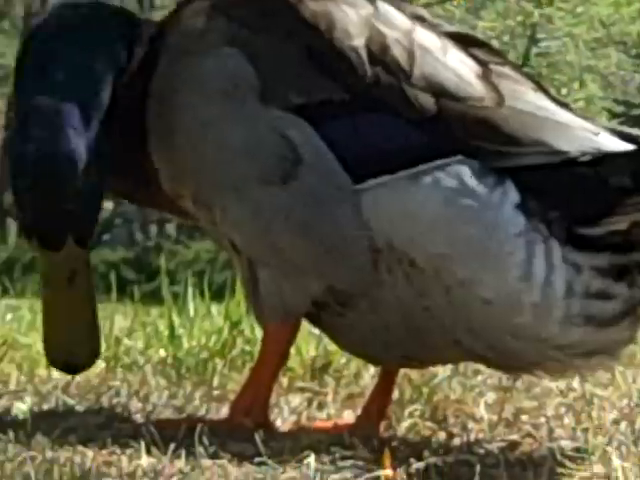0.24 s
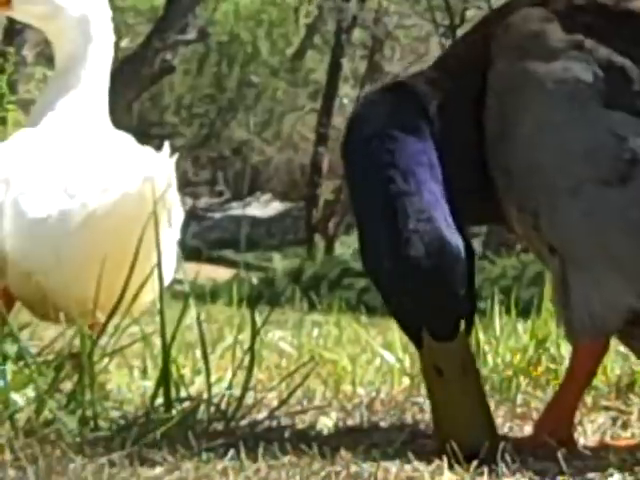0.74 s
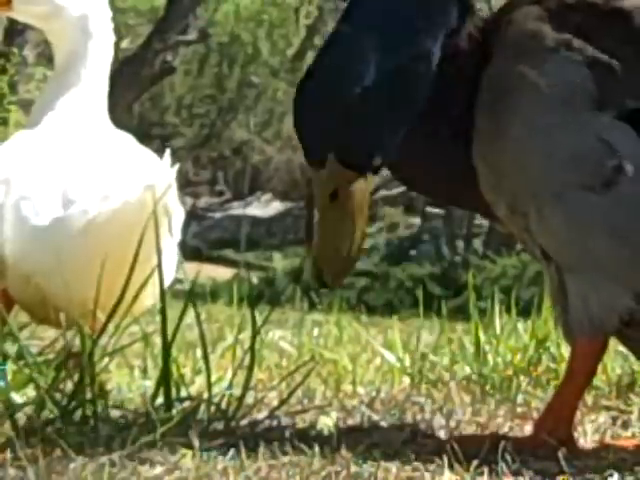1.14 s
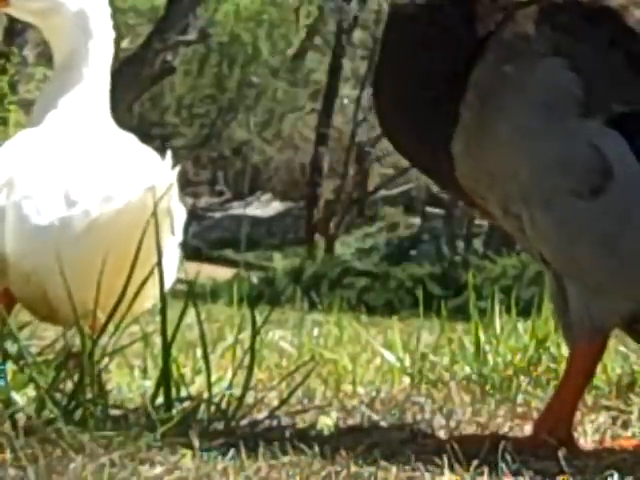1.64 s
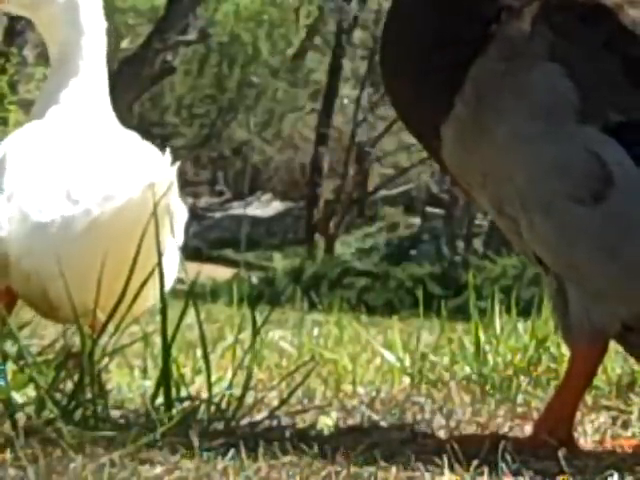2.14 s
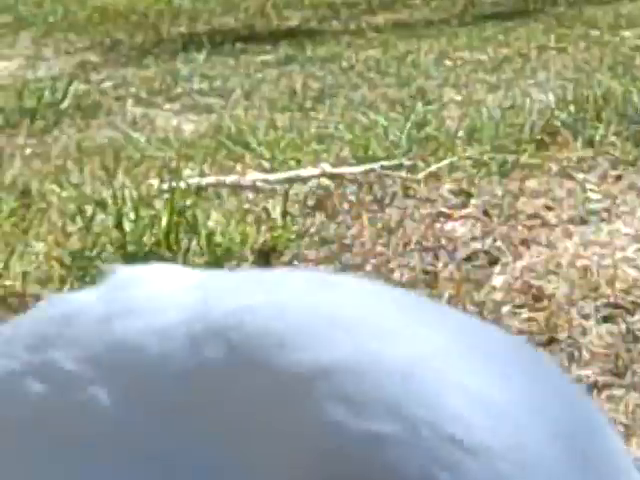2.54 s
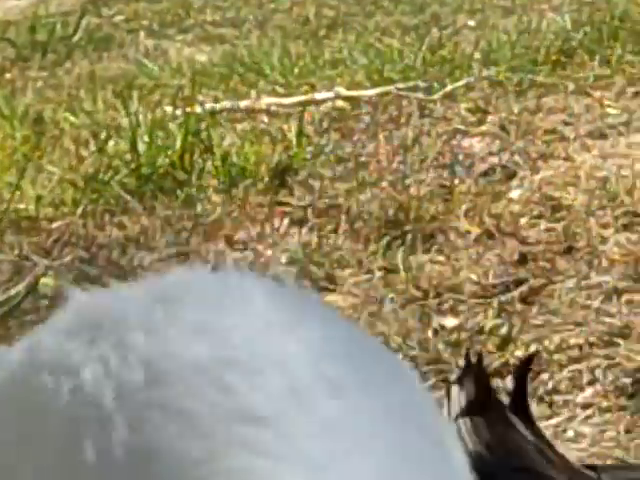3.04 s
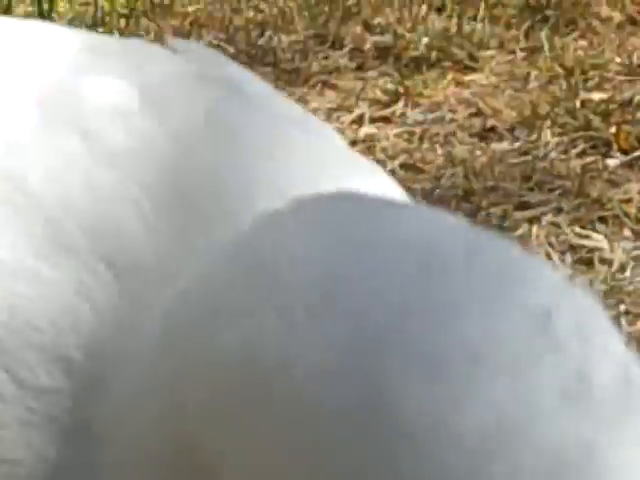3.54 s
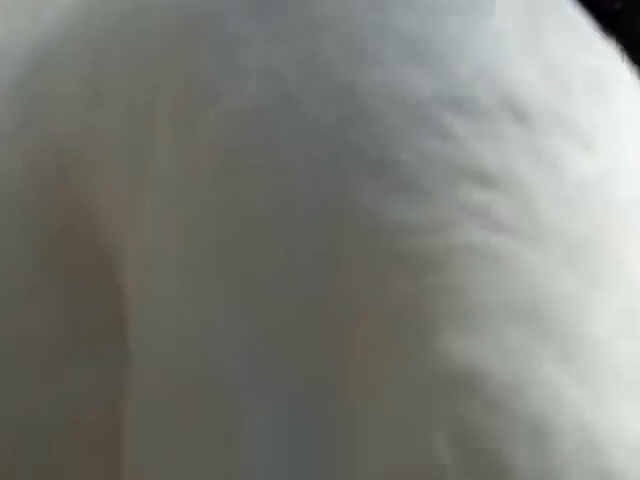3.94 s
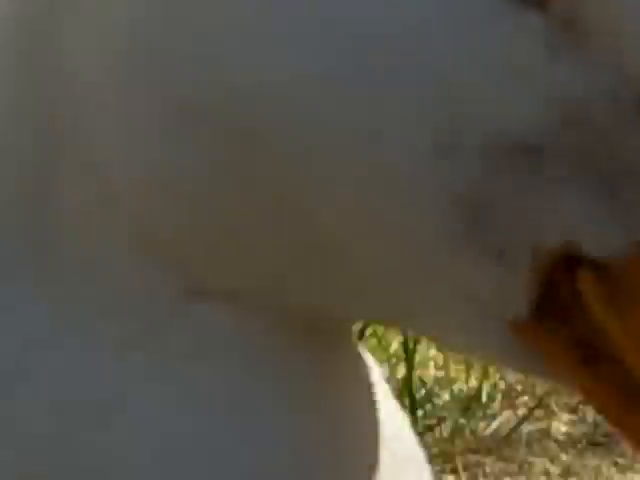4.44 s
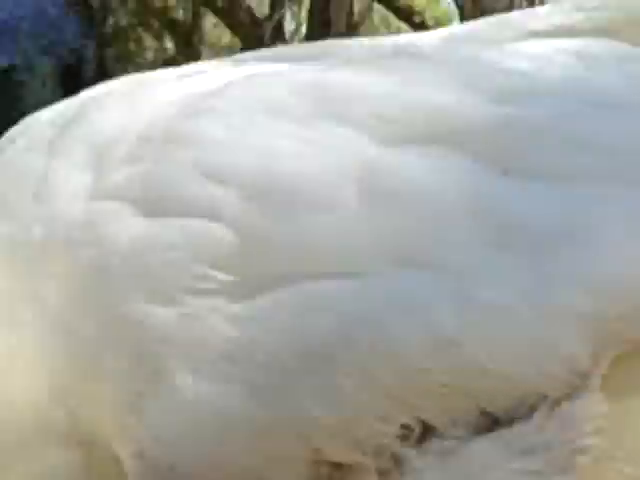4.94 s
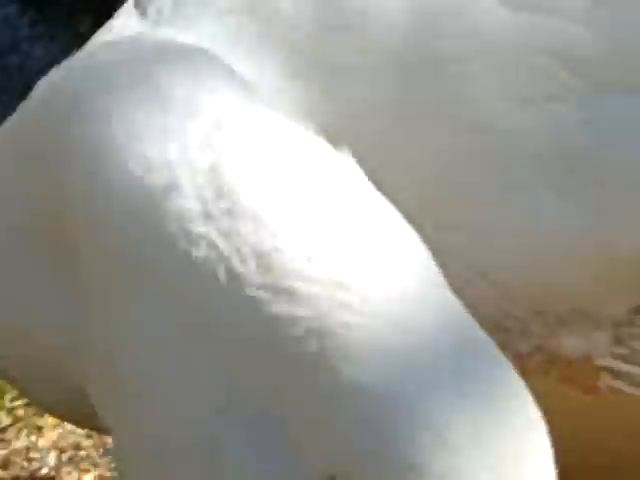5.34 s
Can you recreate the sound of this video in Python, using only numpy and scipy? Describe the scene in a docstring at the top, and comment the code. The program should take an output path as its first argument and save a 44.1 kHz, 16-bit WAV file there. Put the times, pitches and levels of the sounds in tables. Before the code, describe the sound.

Outdoors in quiet air, nearby ducks mutter softly and peck at the ground. They break into about a dozen short, raspy quacks, uneven in loudness, with a few clicks of their bills and thin, faint birdsong behind. Near the end the calls give way to a sharp tap on the microphone, brushing feathers, snapping dry blades and gentle handling bumps. Everything is close, with barely any echo.

```python
"""Ducks chat in short, raspy quacks and breathy mutters, foraging on a lawn beside a hand-held camera.
Each call is a handful of slow syrinx beats that ring the throat. Feathers and grass rustle, dry blades
snap, bills peck, push at the ground and clap, and the camera is bumped and rumbles in the hand.
A songbird twitters in the trees, which return a faint echo over quiet open air."""
import sys
import numpy as np
from scipy import signal
from scipy.fft import rfft, irfft
from scipy.io import wavfile
from scipy.ndimage import uniform_filter1d

SR = 44100
rng = np.random.default_rng(int(sys.argv[2]) if len(sys.argv) > 2 else 0)


def int16_out(signal):
    """Quantize to a 16-bit WAV file."""
    q = np.round(np.clip(np.atleast_2d(signal).T, -1, 1) * 32767)
    wavfile.write(sys.argv[1], SR, q.astype(np.int16))


N = 246519
T = np.arange(N) / SR
FFT_SIZE = 4096
FREQ_HZ = np.maximum(np.fft.rfftfreq(FFT_SIZE, 1 / SR), 1)


def undb(db):
    """Decibels to gain."""
    return 10 ** (np.asarray(db) / 20)


def unit(x):
    """Scale to rms 1."""
    return x / np.sqrt(np.mean(x ** 2))


def decay(t, t60_s):
    """Exponential fall, 60 dB in t60_s."""
    return np.exp(-np.log(1000) * t / t60_s)


def colour(points):
    """Gain over frequency from (freq_hz, gain_db) points."""
    hz, db = np.transpose(points)
    return undb(np.interp(np.log(FREQ_HZ), np.log(hz), db))


def peak(hz, width_hz):
    """Gain of a resonance."""
    return 1 / (1 + ((FREQ_HZ - hz) / (width_hz / 2)) ** 2)


def shelf(hz):
    """Rises from 0 to 1 around hz."""
    return 1 / (1 + (hz / FREQ_HZ) ** 10)


def ring(x, gain):
    """Minimum-phase filter with this gain over frequency."""
    cepstrum = irfft(np.log(gain + 1e-6))
    cepstrum[1:FFT_SIZE // 2] *= 2
    cepstrum[FFT_SIZE // 2 + 1:] = 0
    impulse = irfft(np.exp(rfft(cepstrum)))
    return signal.fftconvolve(x, impulse)[:len(x)]


def walk(rate_hz):
    """Random drift, spread near 1."""
    knots = rng.standard_normal(N // 100)
    return np.interp(T * rate_hz, np.arange(len(knots)), knots)


def add(out, start_s, x):
    """Mix x into out."""
    i = int(start_s * SR)
    skip = max(-i, 0)
    x = x[skip:N - i]
    out[i + skip:i + skip + len(x)] += x


# Background spectrum: freq_hz, gain_db
AIR_SPECTRUM = [(18, -29.5), (30, -9.5), (79, -5), (300, -9.5), (2000, -10.5), (8300, -19.5),
                (16000, -25.5)]

def open_air(level_db=-60):
    """Quiet, slightly wavering background noise."""
    noise = unit(ring(rng.standard_normal(N), colour(AIR_SPECTRUM)))
    return noise * undb(level_db + walk(rate_hz=18))


# Windpipe and throat resonances: freq_hz, width_hz, gain_db
THROAT_MODES = [(985, 200, -12.5), (1316.6, 150, -3), (1649, 160, -3.5), (2035, 87, -0.5),
                (2461, 150, -6.5), (2823, 240, -6), (3356, 260, -7), (4046, 281, -15.5), (4535, 300, -17.5),
                (5086, 240, -25.5), (5650, 450, -31)]

def quack(rate_hz, swell_s, fade_s, bill_hz, pitch_ratio, bright_db, wheeze_db, wheeze_hz, breath):
    """One call, loudest at 0.1 s: each syrinx beat rings the throat and puffs turbulent air."""
    open_s, ring_s, lag_s = 0.0015, 0.0024, 0.0003
    shut_hz, shut_db, bill_db = 1320, -7, 6
    rasp, bend, lift = 0.24, 0.12, 0.041
    scatter, slip_rad, uneven_db = 0.012, 0.5, 2
    t = np.arange(-SR // 10, SR // 10) / SR
    mode_hz, _, mode_db = np.transpose(THROAT_MODES)
    modes = len(mode_hz)
    power = sum((undb(db) * peak(hz * pitch_ratio, width)) ** 2 for hz, width, db in THROAT_MODES)
    throat = np.sqrt(power * shelf(850))
    hiss = undb(-33) / np.hypot(1, FREQ_HZ / 7000)
    tone_db = bright_db * (shelf(2300) - shelf(4900)) + wheeze_db * peak(wheeze_hz, 1700) ** 2
    phase = rng.uniform(0, 2 * np.pi, modes)
    call, beats = np.zeros(len(t)), np.arange(-4, 5)
    for beat_s in beats / rate_hz + lag_s * beats ** 2:  # beats spread as the call runs down
        near = np.abs(t - beat_s) < 1 / rate_hz
        since_s = t[near] - beat_s
        effort = 1 / (1 + abs(beat_s / (swell_s if beat_s < 0 else fade_s)) ** 3.98)
        # Effort opens the bill: resonances climb, upper bands come out.
        opening = np.sqrt(effort)
        shape_db = tone_db + bill_db * peak(shut_hz + (bill_hz - shut_hz) * opening, 280)
        shape_db += shut_db * (1 - opening) * (shelf(1400) - shelf(4400) / 2)
        detune = 1 - lift * (1 - opening) + scatter * rng.standard_normal(modes)
        pitch_hz = mode_hz * pitch_ratio * detune
        cycles = np.outer(since_s + bend * rate_hz * since_s ** 2, pitch_hz)
        angle = 2 * np.pi * cycles + phase + slip_rad * rng.standard_normal(modes)
        level_db = mode_db + np.interp(pitch_hz, FREQ_HZ, shape_db)
        level_db += uneven_db * rng.standard_normal(modes)
        flow = 2 / (np.exp(-since_s / open_s) + np.exp(since_s / ring_s))
        voice = flow * (np.sin(angle) @ undb(level_db))
        air = unit(ring(rng.standard_normal(len(since_s)), throat * undb(shape_db) + hiss))
        leak = 2 * breath * np.cos(np.pi / 2 * rate_hz * since_s)
        puff = unit((flow + leak) * air)
        call[near] += effort * unit(unit(voice) + (rasp + 2 * breath) * puff)
    return call / np.sqrt(2)


def breathiness(level_db, midpoint_db=-36):
    """The softer a call, the more of it is air."""
    return 0.08 + 0.4 / (1 + undb(level_db - midpoint_db) ** 2)


# Soft calls: centre_s, relative_db, swell_s, open_bill_hz, wheeze_db, wheeze_hz
MUTTERS = [(.071, -20.5, 0.024, 1860, 5.5, 4360), (0.141, -27, 0.023, 1600, -9, 4430),
           (0.411, -35, 0.024, 1220, -13, 4500), (.995, -37, 0.026, 1115, 0, 4500),
           (1.531, -40.5, 0.036, 1080, 15, 4740), (1.675, -32.5, 0.029, 1200, 7, 4500),
           (1.755, -29.5, 0.017, 2190, 32, 5540), (2.078, -38, 0.034, 1340, 6, 4770),
           (2.272, -33, 0.028, 1640, 6, 4530), (2.599, -23.5, 0.02, 1180, 23.5, 5240)]
# Full calls: centre_s, relative_db, swell_s, open_bill_hz, pitch_ratio, wheeze_db, wheeze_hz
QUACKS = [(2.343, -12, 0.025, 1970, 1.003, 11.5, 4950), (2.540, -7.5, 0.019, 2070, 1.016, 6, 5130),
          (2.934, -10.5, .018, 1458, 0.984, 3, 4900), (3.136, -4.5, 0.018, 1650, 1, -0.5, 5300),
          (3.387, -22, .019, 1780, 1.01, 8, 5330), (3.594, -14.5, 0.022, 1445, 1.014, 11.5, 5280),
          (3.788, -13, .021, 1630, 1.01, 16.5, 5050), (4.244, -27, .013, 1280, 1.06, 18, 4800),
          (4.296, -10.5, 0.018, 1770, 0.997, 5, 5400), (4.460, -23, 0.015, 1560, 0.96, 3, 5000),
          (4.497, -5.5, 0.019, 2070, 1.015, 5, 4900), (4.721, -13.5, 0.021, 2280, 1.025, 5, 4340)]

def ducks(gain_db=-7.5, full_effort_db=-6):
    """Quacks and breathy mutters; a weaker quack beats slower and sounds duller."""
    out = np.zeros(N)
    for centre_s, db, swell_s, bill_hz, pitch_ratio, wheeze_db, wheeze_hz in QUACKS:
        rate_hz = 75.5 + 0.68 * (db - full_effort_db)
        bright_db = -2 + 1.11 * (db - full_effort_db)
        call = quack(rate_hz, swell_s, 1.2 * swell_s, bill_hz, pitch_ratio, bright_db,
                     wheeze_db, wheeze_hz, breathiness(db))
        add(out, centre_s - 0.1, undb(db) * call)
    rate_hz, pitch_ratio, bright_db = 72, 0.92, -2.5
    for centre_s, db, swell_s, bill_hz, wheeze_db, wheeze_hz in MUTTERS:
        call = quack(rate_hz, swell_s, swell_s, bill_hz, pitch_ratio, bright_db,
                     wheeze_db, wheeze_hz, breathiness(db))
        add(out, centre_s - 0.1, undb(db) * call)
    return undb(gain_db) * out


def echo(x, t60_s, onset_s):
    """Diffuse returns from ground, bodies and trees."""
    t = np.arange(SR) / SR
    tail = rng.standard_normal(SR) * decay(t, t60_s) * (1 - np.exp(-t / onset_s))
    return signal.fftconvolve(x, tail / np.linalg.norm(tail))[:N]


def crackle(spectrum, band_rate_hz, spread_db, hiss):
    """Tiny uneven slips over hiss; blades of each size tick in their own band."""
    out, count = hiss * rng.standard_normal(N), int(band_rate_hz * N / SR)
    for hz in np.geomspace(400, 14000, 9):
        signs = rng.choice([-1, 1], count)
        size_db = spread_db * np.minimum(rng.exponential(size=count), 3)
        slips = np.zeros(N)
        slips[rng.integers(0, N, count)] = signs * undb(size_db)
        out += ring(unit(slips), peak(hz, hz / 2))
    return unit(ring(out, colour(spectrum)))


# Feathers and dry blades brushing by: centre_s, relative_db, half_width_s
STROKES = [(.071, -42.5, 0.021), (0.165, -45, 0.022), (.42, -55, 0.027), (0.61, -43, 0.038),
           (2.415, -39, 0.012), (2.435, -54, 0.15), (2.491, -47, .01), (4.537, -44.5, 0.072),
           (4.847, -46, 0.031), (5.06, -44.5, 0.049), (5.183, -50, 0.036), (5.288, -39.5, .012),
           (5.43, -52.5, 0.13)]
# Their spectrum: freq_hz, gain_db
BRUSH_SPECTRUM = [(500, -10), (2000, -3), (9000, -3), (16000, -7.5)]
# Envelope of a rooting bill: time_s, level_db
ROOTING = [(.31, -67), (.35, -47), (.45, -47), (.5, -65.5), (.55, -47), (.61, -37.5), (.665, -58),
           (.8, -48), (.92, -64)]
# Torn turf spectrum: freq_hz, gain_db
TURF_SPECTRUM = [(70, -22), (210, 2), (450, -10.5), (1170, 1.5), (2400, -13.5), (10000, -22.5),
                 (15000, -39)]

def rustle(stroke_gain_db=-1, flutter_db=2):
    """Feathers brush past in short strokes; a bill tears at dry turf."""
    feathers = crackle(BRUSH_SPECTRUM, band_rate_hz=70, spread_db=5.5, hiss=0.45)
    turf = crackle(TURF_SPECTRUM, band_rate_hz=220, spread_db=3.5, hiss=0.4)
    strokes = sum(undb(db + stroke_gain_db) / (1 + ((T - centre_s) / half_width_s) ** 2 / 2) ** 2
                  for centre_s, db, half_width_s in STROKES)
    time_s, level_db = np.transpose(ROOTING)
    rooting = undb(np.interp(T, time_s, level_db)) * (T < time_s[-1])
    return (feathers * strokes + turf * rooting) * undb(flutter_db * walk(rate_hz=68))


# Breaking blades: start_s, relative_db
SNAPS = [(.337, -38), (0.475, -31), (2.477, -29), (4.61, -26.5), (5.058, -30), (5.179, -29), (5.378, -27),
         (5.43, -25), (5.548, -24.5)]

def snaps(gain_db=-3, ring_db=4.5):
    """Dry blades break with a crisp tick, each at its own pitch."""
    out, t = np.zeros(N), np.arange(SR // 20) / SR
    for start_s, db in SNAPS:
        hz = rng.uniform(3000, 11000)
        blade = colour(BRUSH_SPECTRUM) * undb(ring_db * peak(hz, hz / 2))
        tick = ring(rng.standard_normal(len(t)) * decay(t, t60_s=0.011), blade)
        add(out, start_s, undb(db + gain_db) * tick / np.abs(tick).max())
    return out


# Pecks at the ground, knocks on the camera: start_s, peak_db, treble_db
PECKS = [(.397, -31, -22), (.539, -33.5, -15), (0.564, -29, -8), (.604, -22.5, -12), (.643, -21.5, -11),
         (.828, -30, -1), (0.881, -27.5, -8), (5.0193, -6.5, 6.5), (5.083, -29.5, -11), (5.283, -26, -30),
         (5.348, -22, 12.5)]
# Bills clapping shut: start_s, peak_db
CLAPS = [(1.422, -34.5), (1.483, -29), (2.038, -33), (2.3047, -14.5), (2.8946, -13.5), (4.253, -21.5)]
# Contact spectrum: freq_hz, gain_db
KNOCK_SPECTRUM = [(60, -42), (250, -14), (520, -6), (1050, 6.5), (2000, -5.5), (3500, -13.5), (7000, -19.5),
                  (15000, -26)]

def pecks_and_claps(crunch=0.23, treble_hz=2500, clap_treble_db=-3):
    """Sharp contact, then crunch; harder is brighter and shorter. A clap rings the hollow bill."""
    out, t = np.zeros(N), np.arange(SR // 10) / SR
    bill_ring_db = 16.5 * peak(3550, width_hz=1100)
    blows = [(*peck, 0) for peck in PECKS] + [(*clap, clap_treble_db, bill_ring_db) for clap in CLAPS]
    for start_s, peak_db, treble_db, ring_db in blows:
        t60_s = 0.024 / 2 ** (treble_db / 24)
        blow = crunch * rng.standard_normal(len(t)) * decay(t, t60_s)
        blow[0] += 1
        tilt_db = treble_db * FREQ_HZ / (FREQ_HZ + treble_hz)
        hit = ring(blow, colour(KNOCK_SPECTRUM) * undb(ring_db + tilt_db))
        add(out, start_s, undb(peak_db) * hit / np.abs(hit).max())
    return out


# Soft, low thumps: centre_s, level_db
THUMPS = [(.608, -41.5), (2.993, -51.5), (3.5, -48), (4.377, -49.5), (5.058, -43), (5.292, -48.5),
          (5.424, -45), (5.483, -48)]

def thumps(sigma_s=0.024, boom_hz=225):
    """Soft, low thumps: a bill pushing at the ground, and bumps on the camera."""
    out, t = np.zeros(N), np.arange(-SR // 10, SR // 10) / SR
    push = np.exp(-(t / sigma_s) ** 2 / 2)
    push_rms = np.sqrt(np.mean(push ** 2))
    resonance = peak(boom_hz, width_hz=95) + undb(-19) * peak(boom_hz, width_hz=810)
    for centre_s, db in THUMPS:
        boom = ring(push * rng.standard_normal(len(t)), resonance)
        add(out, centre_s - 0.1, undb(db) * push_rms * unit(boom))
    return out


# Syllables by name: length_s, trill_depth_ratio, pitch_path_hz
SYLLABLES = {"slur": (.075, 0.068, [4235, 5100, 4700, 3730, 3250, 2680]),
             "tsee": (0.057, .005, [8100, 7360, 6840, 7050, 7700]),
             "rise": (0.052, 0.0061, [3400, 3300, 3670, 4220]), "drop": (0.05, 0.008, [9700, 7000, 5700]),
             "swoop": (.062, 0.011, [8300, 5500, 4900, 6200, 7500]),
             "chip": (.028, .01, [4480, 3540, 2500]), "peak": (.038, 0.026, [3600, 5300, 2600]),
             "purl": (.07, 0.054, [3140, 2770, 3260, 2480]), "burr": (0.022, 0.077, [3400, 4100, 4000])}
# Song: start_s, syllable, relative_db
SONG = [(0.652, "chip", -42.5), (.675, "purl", -45.5), (1.607, "slur", -43.5), (1.645, "purl", -40),
        (3.073, "tsee", -49.5), (3.205, "tsee", -50), (3.456, "slur", -46.5), (3.669, "burr", -43.5),
        (3.74, "drop", -43.5), (3.812, "drop", -44), (3.877, "burr", -46), (3.893, "rise", -38),
        (3.991, "swoop", -40.5), (4.092, "swoop", -42), (4.181, "chip", -43), (4.332, "peak", -46),
        (4.385, "chip", -46), (4.645, "peak", -49.5)]

def songbird(trill_hz=84.5, waver=0.03, flutter_db=3):
    """Thin whistles and buzzy trills: a few syllables at varying strengths."""
    out = np.zeros(N)
    wobble = waver * walk(rate_hz=400)
    flutter = undb(flutter_db * walk(rate_hz=160))
    for start_s, syllable, db in SONG:
        length_s, depth, path_hz = SYLLABLES[syllable]
        progress = np.linspace(0, 1, int(length_s * SR))
        span = int(start_s * SR) + np.arange(len(progress))
        hz = np.interp(progress, np.linspace(0, 1, len(path_hz)), path_hz)
        hz = uniform_filter1d(hz, size=400)
        hz *= 1 + wobble[span] + depth * np.sin(2 * np.pi * trill_hz * T[span])
        envelope = flutter[span] * np.sqrt(np.abs(np.sin(np.pi * progress)))
        add(out, start_s, undb(db) * envelope * np.sin(2 * np.pi * np.cumsum(hz) / SR))
    return out


def hand_rumble(start_s=2.7, level_db=-69.5, uneven_db=4):
    """The camera rumbles in the hand as it is carried among the ducks."""
    rumble = unit(ring(rng.standard_normal(N), peak(125, width_hz=200)))
    return rumble * undb(level_db + uneven_db * walk(rate_hz=30)) * (T > start_s)


def scene():
    """Near ducks, a bird in the trees and open air, in mono."""
    near, bird = ducks() + pecks_and_claps(), songbird()
    ground = undb(-15) * echo(near, t60_s=0.07, onset_s=0.003)
    leaves = undb(-6) * echo(bird, t60_s=0.12, onset_s=0.004)
    trees = undb(-48) * echo(near, t60_s=0.86, onset_s=0.03)
    trees += undb(-15) * echo(bird, t60_s=0.72, onset_s=0.031)
    background = open_air() + thumps() + hand_rumble() + rustle() + snaps()
    return (near + undb(-2) * bird + ground + leaves + trees + background)[None]


def record(dry, asymmetry=0.038, cutoff_hz=16100):
    """Slightly lopsided soft saturation, then a steep low-pass."""
    rounded = np.tanh(dry + asymmetry * dry ** 2)
    return signal.sosfilt(signal.ellip(10, 0.2, 70, cutoff_hz, fs=SR, output="sos"), rounded)


dry = scene()
out = record(dry)
int16_out(out)
```